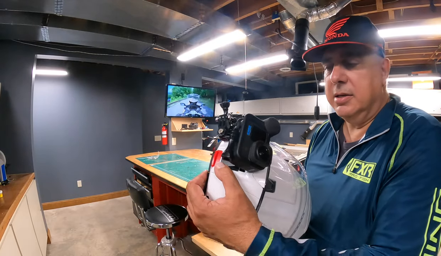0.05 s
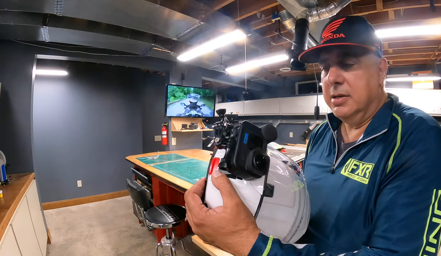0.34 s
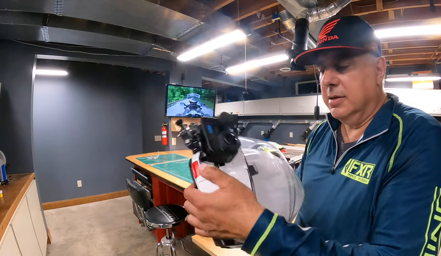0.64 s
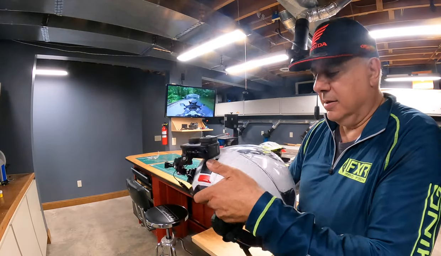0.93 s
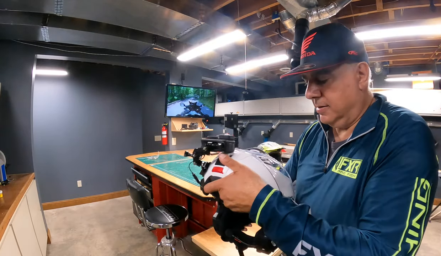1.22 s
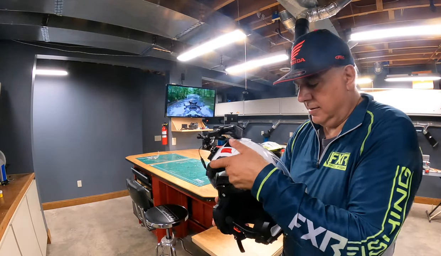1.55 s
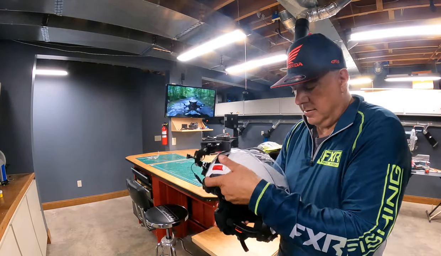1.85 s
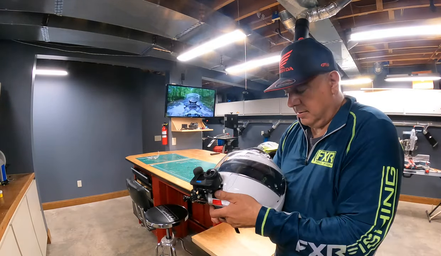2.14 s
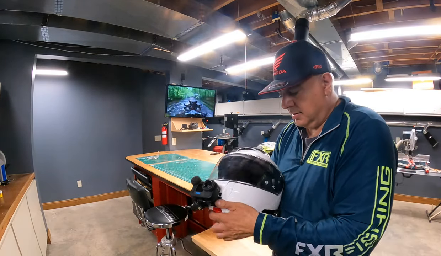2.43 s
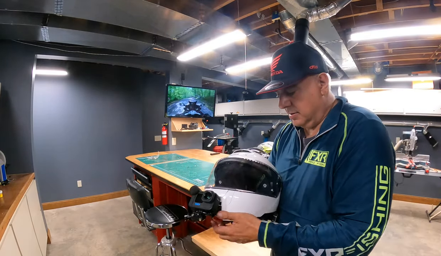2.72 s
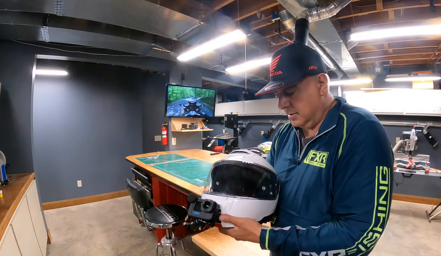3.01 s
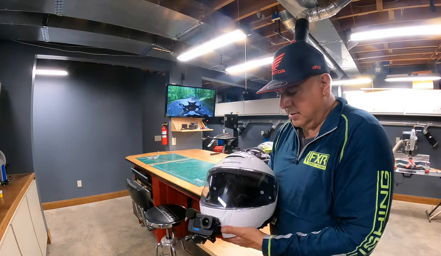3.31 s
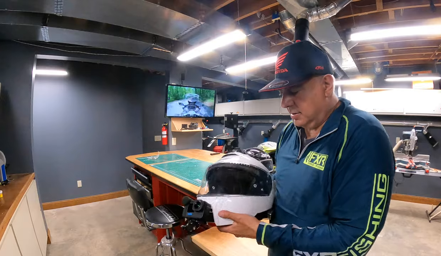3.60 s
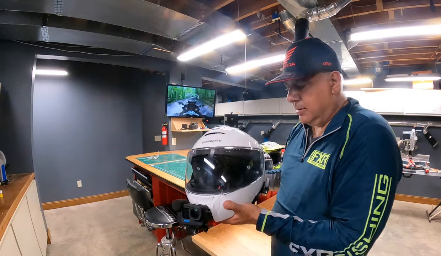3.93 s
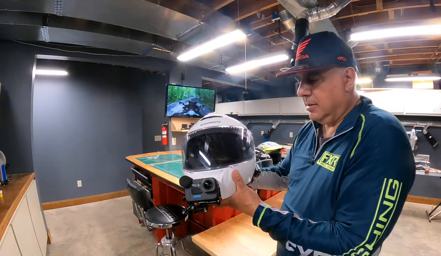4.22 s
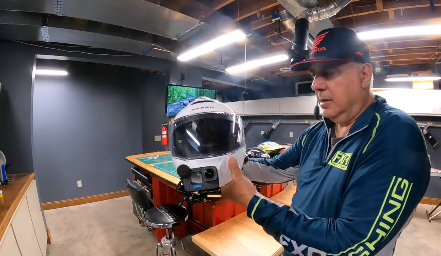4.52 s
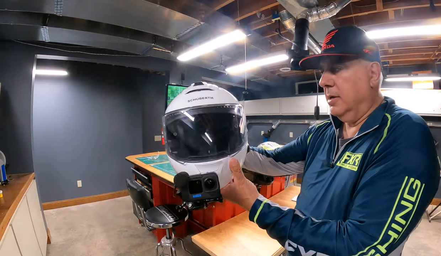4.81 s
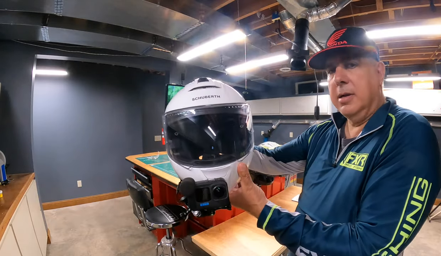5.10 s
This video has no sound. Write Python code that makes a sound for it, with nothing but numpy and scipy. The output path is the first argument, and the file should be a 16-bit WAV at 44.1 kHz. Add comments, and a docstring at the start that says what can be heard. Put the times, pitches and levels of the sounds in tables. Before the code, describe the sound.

Hands rub and tap a hollow helmet indoors, its fittings clicking, with one louder snapping knock as the visor closes.

```python
"""Handling a motorcycle helmet

A helmet with a camera mount is turned over in the hands in a workshop. Palms and sleeves
rub the shell, plastic fittings click and fingers bump the hollow shell. Once, the visor
swings shut with a thud and a double snap. The room echoes over a faint rush of ventilation."""
import sys
import numpy as np
from scipy import signal
from scipy.fft import rfft, irfft, next_fast_len
from scipy.io import wavfile
from scipy.ndimage import map_coordinates

SR = 44100
rng = np.random.default_rng(int(sys.argv[2]) if len(sys.argv) > 2 else 0)


def materialize(psi):
    """Save the field psi as 16-bit PCM at rate SR to the path in sys.argv[1].

    A 1-D psi becomes a single channel; in a 2-D psi each row is a channel.
    """
    bounded = np.clip(np.atleast_2d(psi).T, -1, 1)
    quanta = np.round(bounded * 32767).astype(np.int16)
    wavfile.write(sys.argv[1], SR, quanta)


N = 227096
T = np.arange(SR // 2) / SR  # half a second of time for one short sound

# The tone of cracking plastic. Each row: frequency in Hz, level in dB.
CRACK_TONE = [(40, -23), (200, -10.5), (500, -4.5), (750, -7), (1200, 7), (3000, 0.5), (7200, -1),
              (8600, -7.5), (13000, -13), (16000, -36.5)]


def amp(db):
    """Turn decibels into a number to multiply by."""
    return 10 ** (np.asarray(db) / 20)


def unit(x):
    """Scale a sound so its average strength (rms) is 1."""
    return x / np.sqrt(np.mean(x ** 2) + 1e-20)


def along(points, hz):
    """Read between rows of frequency and value, on a log frequency scale."""
    freqs, values = np.transpose(points)
    return np.interp(np.log(hz + 1), np.log(freqs + 1), values)


def fade(t, t60):
    """Die away by 60 dB in t60 seconds, the fade time."""
    return np.exp(-np.log(1000) * t / np.maximum(t60, 1e-3))


def wobble(rate):
    """A smooth curve through rate random points a second."""
    points = rng.standard_normal(int(N * rate / SR) + 4)
    return map_coordinates(points, [np.arange(N) * rate / SR])


def filtered(x, gain):
    """Turn each frequency up or down by gain(hz)."""
    n = x.shape[-1]
    size = next_fast_len(n + SR // 4)
    return irfft(rfft(x, size) * gain(np.fft.rfftfreq(size, 1 / SR)), size)[..., :n]


def struck(x, gain):
    """Filter a short sound so that nothing is heard before it starts."""
    size = 2 * len(x)
    log_gain = np.log(np.maximum(gain(np.fft.rfftfreq(size, 1 / SR)), 1e-6))
    cepstrum = irfft(log_gain)
    cepstrum[1:size // 2] *= 2  # move all ringing to after the hit
    cepstrum[size // 2 + 1:] = 0
    return irfft(rfft(x, size) * np.exp(rfft(cepstrum)))[:len(x)]


def spread(pair):
    """Blend two unrelated sounds into left and right, most alike in the bass."""
    # Each row: frequency in Hz, how alike the sides are (1 means the same).
    likeness = [(200, 0.83), (600, 0.72), (2000, 0.56), (5000, 0.78), (9000, 0.8), (13000, 0.35)]
    angle = lambda hz: np.arccos(np.clip(along(likeness, hz), -1, 1)) / 2
    mid, side = filtered(pair, lambda hz: np.array([np.cos(angle(hz)), np.sin(angle(hz))]))
    return np.array([mid + side, mid - side])


def plastic(hz):
    """How strongly the visor and fittings ring at each frequency."""
    # Their quickly dying tones. Each row: pitch in Hz, width in Hz, level in dB.
    tones = [(1000, 228, -4), (1322, 57, -4.5), (1623, 76, -3), (2140, 410, -22.5), (2840, 220, -18.5),
             (3030, 200, -3), (3326, 200, -7.5), (3466, 250, -10), (4900, 510, -9), (5340, 620, -16),
             (6700, 1100, -16)]
    power = sum(amp(db) ** 2 / (1 + ((hz - pitch) / max(width, pitch / 20)) ** 2) ** 2
                for pitch, width, db in tones)
    return np.sqrt(power)


def crack(ring_db, top_hz):
    """The gain curve of a plastic crack: ringing added, highs softened."""
    return lambda hz: (amp(along(CRACK_TONE, hz)) * (1 + amp(ring_db) * plastic(hz))
                       / np.hypot(1, hz / top_hz))


def contact(t60, gain, grit):
    """A hard tap with a short gritty skid, filtered by gain; its peak is near 1."""
    skid = rng.standard_normal(len(T)) * fade(T, t60)
    force = grit * skid / np.linalg.norm(skid)
    force[0] += 1
    tap = struck(force, gain)
    return tap / (2.8 * np.std(tap[:SR // 300]))


def ventilation(level_db=-68):
    """A faint, steady rush of air."""
    # The air's tone. Each row: frequency in Hz, level in dB.
    air_tone = [(25, -8.5), (60, -11), (115, -25), (145, 5.5), (240, -2.5), (400, -9.5), (700, -17),
                (1200, -14), (1650, -16.5), (2400, -30), (4000, -31), (6500, -28), (10000, -41.5),
                (15000, -48)]
    noise = spread(rng.standard_normal((2, N)))
    return amp(level_db) * unit(filtered(noise, lambda hz: amp(along(air_tone, hz))))


def friction(tone, slips_per_s, slip_db, flutter_db):
    """Rubbing noise: tiny slips of uneven size on top of a smooth hiss."""
    slips = (rng.random(N) < slips_per_s / SR) * rng.standard_normal(N)
    force = spread(rng.standard_normal((2, N))) + amp(slip_db) * unit(slips)
    flutter = amp(flutter_db * wobble(60))
    return unit(filtered(force * flutter, lambda hz: amp(along(tone, hz))))


def swish(peak_s, length):
    """Cloth grows louder, then fades evenly, around its fastest moment."""
    distance = np.abs(np.arange(N) / SR - peak_s) / length
    return (1 + 2.9 * distance) * np.exp(-2.6 * distance)


def slide(start, length, rise_s=0.033, slow_s=0.054):
    """A palm gathers speed, keeps it, then slows to rest."""
    t = np.arange(N) / SR - start
    return np.clip(t / rise_s, 0, 1) * np.exp(-np.maximum(t - length, 0) / slow_s)


def rubbing():
    """Sleeves hiss; sliding palms scrape the shell, make it creak and stir its hollow."""
    # A restless grip keeps the rubbing faintly going. Each row: time in seconds, level in dB.
    grip = [(0, -89), (.5, -84), (.6, -70.5), (2.3, -63.5), (3.0, -72.5), (4.4, -65.5), (4.7, -73),
            (5.0, -78), (5.15, -73.5)]
    # Sleeves pass by. Each row: fastest moment in seconds, length in seconds, level in dB.
    swishes = [(0.536, 0.059, -76), (0.715, 0.079, -57), (0.958, 0.17, -52.5), (1.227, .16, -58.5),
               (1.442, 0.053, -60), (1.6, 0.19, -60.5), (1.742, 0.078, -54), (2.015, 0.089, -51),
               (2.233, 0.029, -66), (3.196, .15, -66), (3.427, 0.24, -63), (3.788, .12, -64.5),
               (3.968, 0.061, -60), (4.2, 0.12, -65.5), (4.38, 0.094, -62.5)]
    # Palms change grip. Each row: start and length in seconds, scrape and hollow levels in dB.
    slides = [(0.547, 0.51, -58, -85), (0.866, 0.16, -46.5, -54), (1.157, .08, -52.5, -51.5),
              (1.404, 0.035, -50.5, -62), (1.494, 0.13, -56, -74), (1.682, 0.044, -50, -55),
              (1.917, .16, -47, -46.5), (2.082, .09, -53, -47.5), (2.184, 0.036, -55, -54),
              (2.375, 0.75, -66.5, -53), (2.987, 0.038, -61, -48), (3.156, .37, -67.5, -65),
              (3.686, .2, -61.5, -52.5), (4.153, 0.21, -59.5, -54.5), (4.296, 0.066, -56.5, -44.5),
              (4.457, .07, -65.5, -68)]
    # The tones of palm, cloth and hollow shell. Each row: frequency in Hz, level in dB.
    scrape_tone = [(40, -44), (115, -31), (160, -19), (350, 3), (470, -3), (610, -1.5), (780, -8.5),
                   (980, -1), (1200, 0.5), (1600, -0.5), (2300, -5.5), (3300, -13), (6000, -20.5),
                   (15000, -44.5)]
    sleeve_tone = [(800, -31.5), (2500, 1), (4000, -1), (7300, -4), (8600, -12), (12500, -18), (15500, -34)]
    hollow_tone = [(40, -37), (115, -32.5), (150, -5.5), (230, 1), (275, -0.5), (340, -8), (450, -30.5),
                   (1000, -41.5), (4000, -69.5)]
    unrest = amp(np.interp(np.arange(N) / SR, *np.transpose(grip)))
    sliding = np.sqrt(sum((amp(db) * slide(s, length)) ** 2 for s, length, db, _ in slides))
    pressing = np.sqrt(sum((amp(db) * slide(s, length)) ** 2 for s, length, _, db in slides))
    swishing = np.sqrt(sum((amp(db) * swish(s, length)) ** 2 for s, length, db in swishes))
    scrape = friction(scrape_tone, slips_per_s=440, slip_db=-5.5, flutter_db=2.6)
    scrape *= amp(2.57) * np.hypot(sliding, unrest)
    sleeve = friction(sleeve_tone, slips_per_s=1600, slip_db=-8, flutter_db=1.0)
    sleeve *= np.hypot(swishing, amp(-6) * unrest)
    hollow = friction(hollow_tone, slips_per_s=54, slip_db=-10.5, flutter_db=3)
    hollow *= amp(-1.5) * np.hypot(pressing, amp(6) * unrest)
    return scrape + amp(-10.5) * sliding * creaks() + sleeve + hollow


def creaks(slips_per_s=70, size_db=3):
    """Plastic sticks and slips in scattered creaks, some louder than others."""
    slips = rng.random(N) < slips_per_s / SR
    sizes = amp(size_db * np.minimum(rng.exponential(size=N), 2))
    creak = contact(0.0014, crack(ring_db=5, top_hz=4000), grit=1.8)
    return unit(room(signal.fftconvolve(slips * sizes, creak)[:N], echo_db=-9.5))


def fittings(focus_db=11, ring_db=2, octaves=0.61, thinness=0.72, rattle_delay_s=0.007):
    """Mount, buckle and vents click, each around its own pitch; loose parts rattle after."""
    # Each row: start in seconds, level in dB, pitch in Hz, rattle size compared with the click.
    clicks = [(.576, -21, 2900, 0.12), (.856, -19, 2720, 0.49), (0.978, -27.5, 1300, .2),
              (1.028, -29, 3760, 0.26), (1.174, -16.5, 1490, 0.49), (1.405, -35, 2840, 0.17),
              (1.419, -29, 1380, .1), (1.444, -30, 5600, 0.22), (1.5803, -31.5, 2564, .05),
              (1.620, -34, 3480, .05), (1.702, -21, 3215, .5), (1.716, -25.5, 2536, 0.32),
              (1.923, -27, 2870, 0.062), (1.965, -28, 1934, .1), (2.018, -13, 2910, 0.14),
              (2.089, -22, 1810, 0.47), (2.154, -25.5, 2200, 0.15), (2.214, -23, 2876, 0.58),
              (2.413, -39.5, 4590, 0.22), (2.473, -24.5, 2576, 0.22), (3.036, -35, 1490, 0.34),
              (3.158, -39, 1750, 0.16), (3.272, -38, 800, 0.54), (3.376, -27, 3370, 0.28),
              (3.482, -31, 1690, 0.065), (3.679, -37.5, 1213, 0.48), (3.813, -24.5, 3130, 0.24),
              (4.093, -40, 1510, 0.55), (4.315, -29.5, 1114, 0.58)]
    track = np.zeros(N)
    for start, db, pitch, rattle in clicks:
        def gain(hz):
            """Low clicks are duller, high ones thinner."""
            focus = amp(focus_db) / (1 + (np.log2((hz + 1) / pitch) / octaves) ** 4)
            ring = focus * (0.3 + amp(ring_db) * plastic(hz)) / 2
            treble_cut = np.hypot(1, hz / (1.6 * pitch))
            bass_cut = np.hypot(1, thinness * pitch / (hz + 100))
            return (amp(along(CRACK_TONE, hz)) + ring) / treble_cut / bass_cut
        level = amp(db - 4.5)
        add(track, start, level * contact(0.017, gain, grit=3.7))
        add(track, start + rattle_delay_s, rattle * level * contact(0.12, gain, grit=3.0))
    return track


def ticks(sharpness=12):
    """Some taps ring briefly at a single pitch."""
    # Each row: start in seconds, level in dB, pitch in Hz.
    taps = [(.945, -33, 935), (.977, -26, 996), (1.028, -34.5, 1070), (2.018, -21.5, 2790),
            (2.062, -36.5, 420), (2.091, -32.5, 669), (2.4845, -12, 2730), (4.160, -39, 915),
            (4.161, -43, 1710), (4.316, -38, 642), (4.486, -39.5, 6030), (4.488, -48, 4390),
            (4.492, -40, 1029), (4.494, -45, 3220), (4.508, -47, 3300)]
    track = np.zeros(N)
    for start, db, pitch in taps:
        ring = lambda hz: 1 / (1 + (sharpness * (hz / pitch - 1)) ** 2)
        add(track, start, amp(db) * contact(0.0077, ring, grit=0.49))
    return track


def bumps(rise_s=0.0019, free_t60=0.17, halving_db=-40, jolt_hz=58, jolt_t60=0.085):
    """Fingers, and once the latching visor, make the hollow shell boom and jolt."""
    # Each row: start in seconds, level in dB, pitch in Hz, jolt compared with the boom in dB.
    blows = [(1.174, -23, 202, -25), (2.061, -26.5, 254, -32), (2.089, -27, 244, -37),
             (2.208, -30, 294, -31), (2.407, -37, 267, -35), (2.52, -27, 235.6, -6),
             (3.042, -35.5, 282.4, -40.5), (3.274, -40, 230, -31), (3.708, -38, 246, -37),
             (3.782, -37, 240, -34), (3.902, -38, 270, -37), (4.218, -37.5, 269, -52),
             (4.315, -32.5, 271.3, -54), (4.683, -48.5, 282, -35.5)]
    track = np.zeros(N)
    for start, db, hz, jolt_db in blows:
        t60 = free_t60 / (1 + amp(jolt_db - halving_db))  # a harder jolt means a shorter boom
        onset = 1 - np.exp(-(T / rise_s) ** 2)
        boom = np.sin(2 * np.pi * hz * T) * fade(T, t60) * onset
        jolt = np.sin(2 * np.pi * jolt_hz * T) * fade(T, jolt_t60)
        add(track, start, amp(db + 1) * (cut_deep_bass(boom) + amp(jolt_db) * jolt))
    return track


def cut_deep_bass(x, edge_hz=135):
    """Take the deep bass out of the boom."""
    return struck(x, lambda hz: 1 / np.hypot(1, (edge_hz / (hz + 1)) ** 4))


def visor():
    """The visor meets its seal, then latches; each snap takes its own paths round the room."""
    # Each row: start in seconds, level in dB, fade time in seconds.
    snaps = [(2.4831, -14.5, 0.03), (2.4893, -12.5, 0.11), (2.513, -16, .03), (2.5172, -4, 0.018),
             (2.5196, -16, 0.011), (2.525, -18, 0.022)]
    heard = np.zeros((2, N))
    for start, db, t60 in snaps:
        track = np.zeros(N)
        add(track, start, amp(db) * contact(t60, crack(ring_db=13, top_hz=6000), grit=1.87))
        heard += room(track, echo_db=0)
    return heard


def thud(start=2.4878, level_db=-3.0, rise_s=0.0027, dull_hz=330):
    """The landing visor makes the padded shell boom, and nearby walls send it back duller."""
    # The shell's tones. Each row: pitch in Hz, level in dB, fade time in seconds.
    shell_tones = [(150.1, -14, 0.12), (210, -3, 0.068), (245.5, -2.5, 0.079), (235.7, -20, 0.44),
                   (289.3, -8.5, .12), (304, -18, 0.29), (356, -16.5, 0.2), (394.6, -22.5, 0.22),
                   (618.5, -28.5, 0.12)]
    # Each row: delay in seconds, level in dB.
    wall_echoes = [(.045, -13.5), (.072, -21.5), (.097, -18.5)]
    track = np.zeros(N)
    ring = sum(amp(db) * np.sin(2 * np.pi * hz * T) * fade(T, t60) for hz, db, t60 in shell_tones)
    boom = -amp(level_db) * cut_deep_bass(ring * (1 - np.exp(-T / rise_s)))
    add(track, start, boom)
    echo = struck(boom, lambda hz: 1 / np.hypot(1, (hz / dull_hz) ** 4))
    for delay, db in wall_echoes:
        add(track, start + delay, amp(db) * echo)
    return track


def room(x, echo_db, rise_s=0.0013, hold_s=0.072):
    """The direct sound plus echoes that hold while the far walls answer, then die away."""
    # How long echoes last. Each row: frequency in Hz, fade time in seconds.
    fade_times = [(100, 0.32), (200, 0.25), (400, 0.51), (1200, 0.68), (3000, 0.7), (7000, 0.62),
                  (12000, 0.42)]
    # How strong they are. Each row: frequency in Hz, level in dB.
    echo_tone = [(40, -13), (115, -18.5), (150, -10), (300, -8), (500, -8), (800, -3), (1300, -5),
                 (2200, -3.5), (3000, -8.5), (4500, -4.5), (7000, -3), (13000, -10.5)]
    hz, t, noise = signal.stft(rng.standard_normal((2, SR)), SR, nperseg=256)
    shape = fade(np.maximum(t - hold_s, 0), along(fade_times, hz)[:, None])
    shape *= 1 - np.exp(-t / rise_s)
    shape /= np.sqrt(np.mean(shape ** 2, axis=1, keepdims=True) * SR)
    tail = spread(signal.istft(noise * shape, SR, nperseg=256)[1])
    tail = filtered(tail, lambda f: amp(along(echo_tone, f)))
    echoes = signal.fftconvolve(x[None], tail, axes=1)[:, :N]
    scatter = rng.standard_normal(SR // 700)  # near surfaces colour left and right differently
    near = np.convolve(x, scatter / np.linalg.norm(scatter))[:N]
    near = filtered(near, lambda f: f ** 2 / (f ** 2 + 700 ** 2))
    return spread(np.array([x, near])) + amp(echo_db) * echoes


def add(track, start, sound):
    """Mix a sound into the track at start seconds."""
    part = track[round(start * SR):][:len(sound)]
    part += sound[:len(part)]


def scene():
    """The helmet is held slightly right of centre in the workshop."""
    closing = visor() + room(thud(), echo_db=0)
    handling = room(fittings(), echo_db=-5) + room(bumps(), echo_db=0.5)
    handling += room(ticks(), echo_db=-2) + rubbing()
    balance = amp([[-.3], [.3]])
    return (closing + handling) * balance + ventilation()


def record(dry, top_hz=15400):
    """The camera picks up nothing above top_hz."""
    return filtered(dry, lambda hz: hz < top_hz)


dry = scene()
out = record(dry)
materialize(out)
```